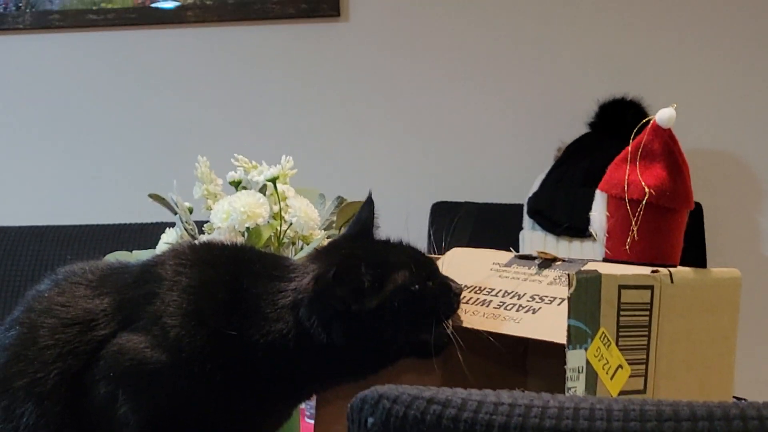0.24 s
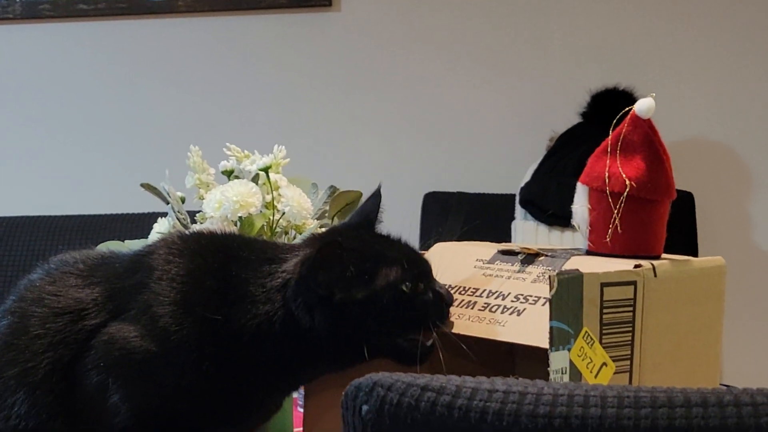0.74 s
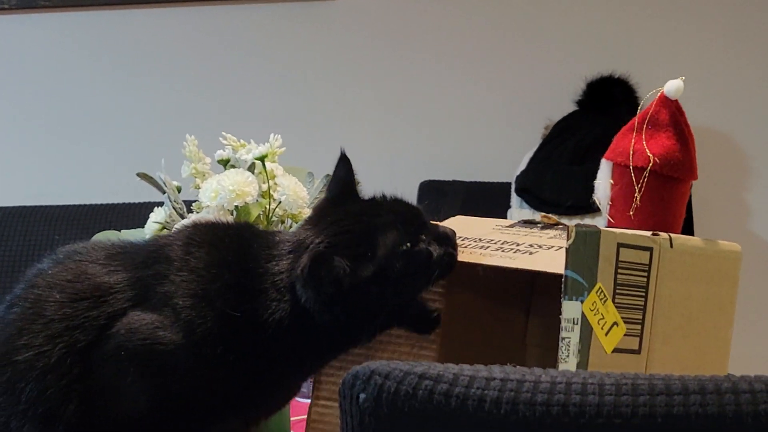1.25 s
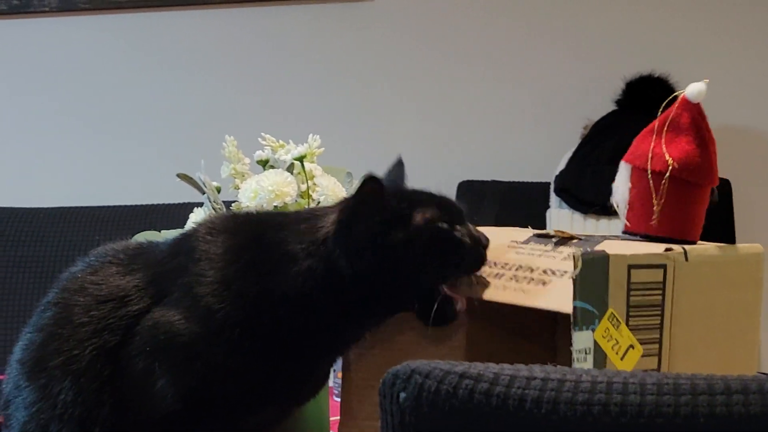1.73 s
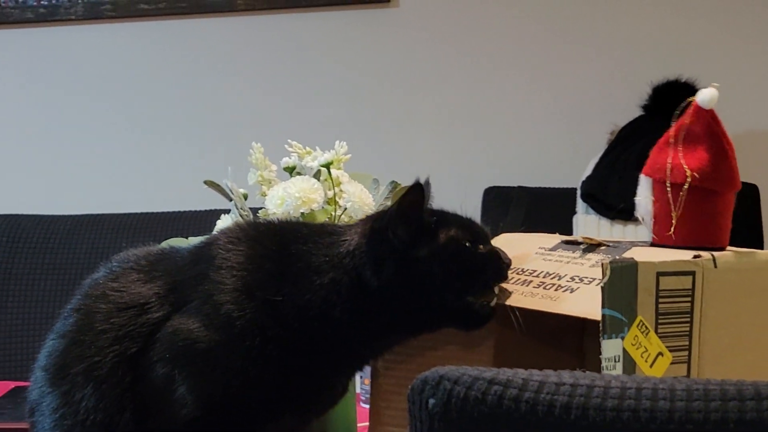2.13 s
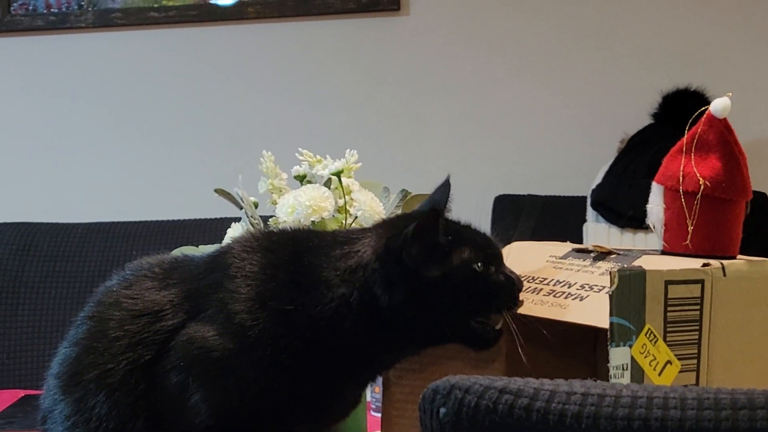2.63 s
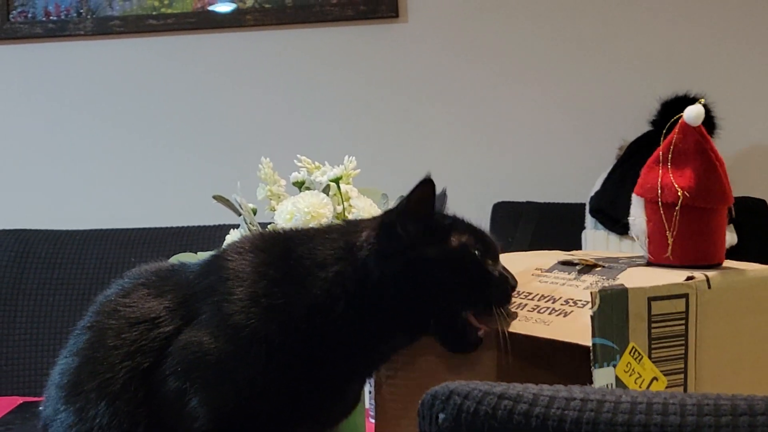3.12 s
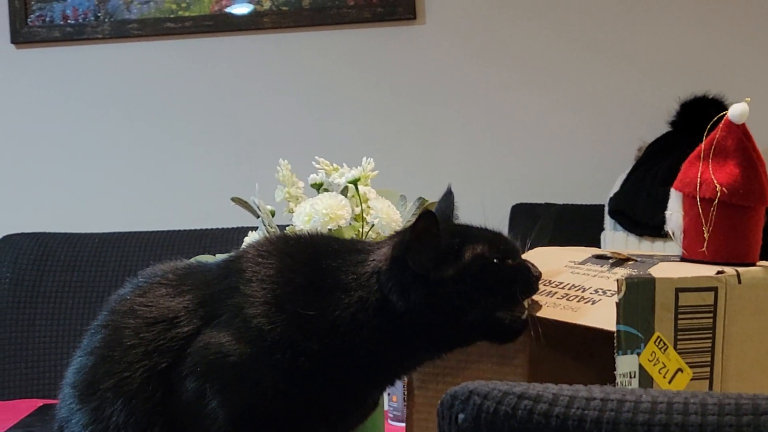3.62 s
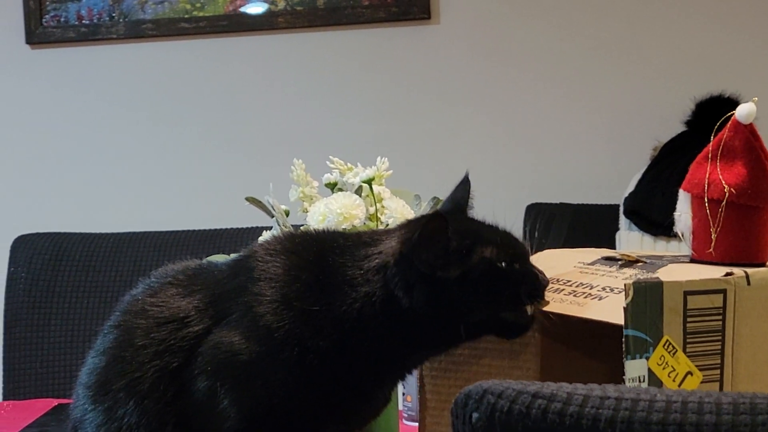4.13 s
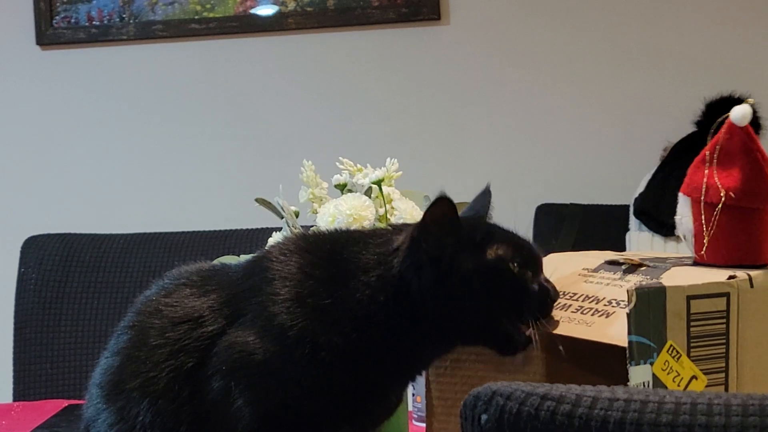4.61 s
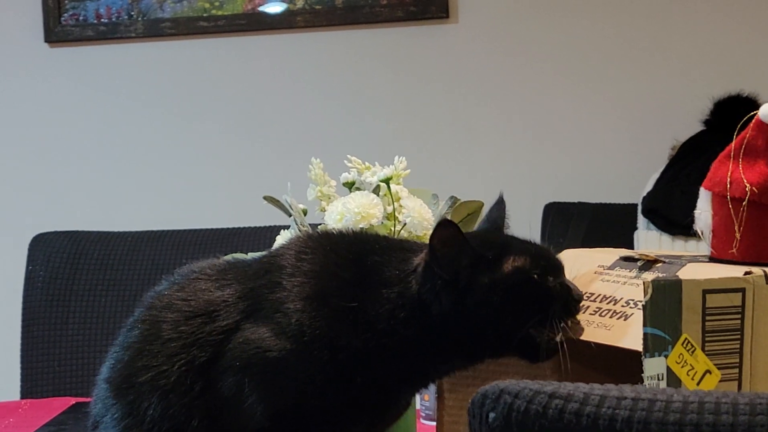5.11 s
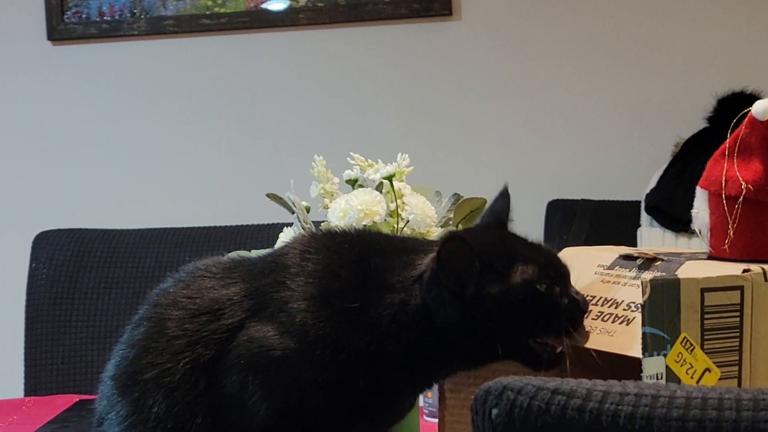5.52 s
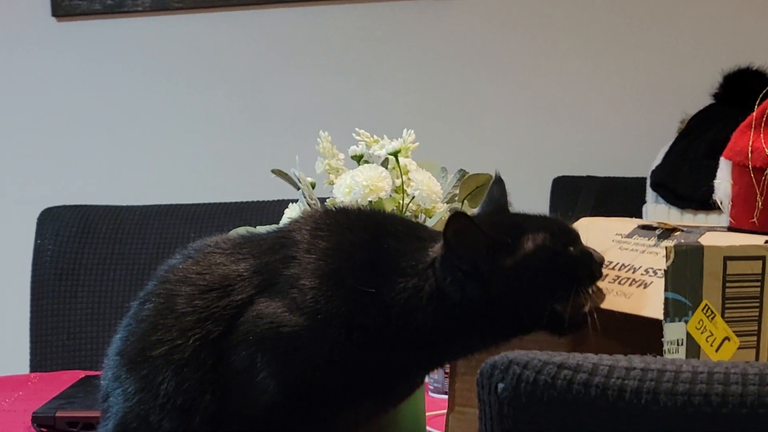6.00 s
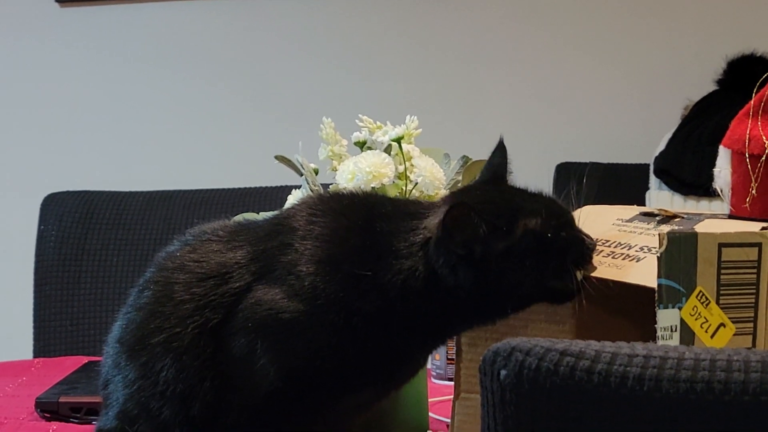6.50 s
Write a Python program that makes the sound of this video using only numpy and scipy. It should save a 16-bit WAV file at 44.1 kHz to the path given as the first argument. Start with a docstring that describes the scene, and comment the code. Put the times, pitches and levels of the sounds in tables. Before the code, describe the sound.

A cat gnaws a cardboard box flap in uneven bouts, with dry rasping, crackly crunches, hollow thumps and sharp jaw snaps in a quiet room.

```python
"""A cat gnaws the flap of a cardboard box in a quiet living room: teeth rasp in bouts, as random fibre ruptures.
Each slip of a tooth crackles, cracks the board and lets the flap spring back with a hollow thump (damped modes).
Jaw snaps, mostly between bouts, are a knock, a clack and a ring of the mouth; a few wet ticks are struck cavities.
A short echo, blended from several random patterns, and a low, slightly wavering hum (filtered noise) surround it."""
import sys
import numpy as np
from scipy import signal
from scipy.fft import rfft, irfft
from scipy.io import wavfile
from scipy.ndimage import uniform_filter1d

SR = 44100
rng = np.random.default_rng(int(sys.argv[2]) if len(sys.argv) > 2 else 0)


def store_wav(level_fs):
    """Save 16-bit WAV to argv[1]."""
    pcm = np.round(np.clip(np.atleast_2d(level_fs), -1, 1) * 32767)
    wavfile.write(sys.argv[1], SR, pcm.T.astype(np.int16))


N = 297675
TIME = np.arange(N) / SR
HIT = np.arange(SR // 4) / SR  # time axis of one short event, s
LEAD_S = 0.02  # onset of an event on the HIT axis

# Stiff bending modes of the board. Each row: frequency in Hz, relative level in dB, t60 in s.
BOARD_MODES = [(1183.4, 7, 0.081), (1287, 2, 0.036), (1600, -9, 0.03), (1893, -14, 0.059),
               (2282, -12, 0.087), (4380, -27, 0.042)]
# Spectrum of cracking board. Each row: frequency in Hz, relative level in dB.
CRACK_SPECTRUM = [(300, -7.5), (540, 9), (700, 2), (820, -12), (1000, 0), (1300, 5.5), (1650, 5),
                  (2300, -5), (2900, -11.5), (3800, -23), (4450, -15), (5200, -19.5), (7000, -23.5)]
# Spectrum of tearing fibres. Each row: frequency in Hz, relative level in dB.
FIBRE_SPECTRUM = [(1500, -33), (2800, -0.5), (4000, -3), (4450, -2.5), (5000, -3), (6400, -4), (7400, -1),
                  (9500, -2.5), (11500, -1), (13300, 4.5), (15000, 3), (16200, 1.5)]


def undb(db):
    """Decibels to gain."""
    return 10 ** (np.asarray(db) / 20)


def unit(x):
    """Scale to rms 1."""
    return x / np.sqrt(np.mean(x ** 2))


def burst(x, db, size=441):
    """Scale a short sound so that its loudest hundredth of a second has this rms level."""
    return x * undb(db) / np.sqrt(uniform_filter1d(x ** 2, size).max())


def along(points, hz):
    """Interpolate (Hz, value) points on a log-frequency axis."""
    f, value = np.transpose(points)
    return np.interp(np.log(np.maximum(hz, 1)), np.log(f), value)


def through(x, response):
    """Convolve with an impulse response, keeping the length."""
    return signal.fftconvolve(x, response)[:len(x)]


def colour(x, points, size=4096):
    """Minimum-phase filter with the given (Hz, dB) spectrum, via the folded cepstrum."""
    log_gain = np.log(undb(along(points, np.fft.rfftfreq(size, 1 / SR))))
    cepstrum = irfft(log_gain)
    cepstrum[1:size // 2] *= 2
    cepstrum[size // 2 + 1:] = 0
    return through(x, irfft(np.exp(rfft(cepstrum))))


def ring(x, modes):
    """Drive exponentially damped sine modes, given as (Hz, dB, t60 s)."""
    response = 0
    for hz, db, t60_s in modes:
        decay = np.exp(-np.log(1000) * HIT / t60_s)
        response = response + undb(db) * np.sin(2 * np.pi * hz * HIT) * decay
    return through(x, response)


def walk(rate_hz):
    """Slow random wander of rms 1: random steps, smoothed twice."""
    k = int(SR / rate_hz)
    steps = np.repeat(rng.standard_normal(N // k + 1), k)
    return unit(uniform_filter1d(uniform_filter1d(steps, k), k)[:N])


def grains(count, per_s, spread_db):
    """Single-sample ruptures at random moments, with random signs and a log-normal spread of size."""
    present = rng.random(count) < per_s / SR
    sign = rng.choice([-1, 1], count)
    return present * sign * undb(spread_db * np.clip(rng.standard_normal(count), -2, 2))


def swell(rise_s):
    """Envelope of a run of ruptures: crests about 1.4 rise_s after LEAD_S, dies away more slowly."""
    t = np.clip((HIT - LEAD_S) / max(rise_s, 1e-4) - 1, -60, 200)
    return 1 / (np.exp(-1.9 * t) + np.exp(0.62 * t))


def strike(delay_s):
    """One firm contact: a click a few samples wide, delay_s after LEAD_S."""
    return np.maximum(1 - abs(HIT - LEAD_S - delay_s) * SR / 2, 0)


def add(track, s, sound):
    """Mix a sound in at time s."""
    i = max(int(s * SR), 0)
    track[i:i + len(sound)] += sound[:N - i]


def diffuse(count, alike_hz):
    """Stereo noise from all sides: the ears share the bass and differ in the treble."""
    mid, side = rfft(rng.standard_normal((2, count)))
    alike = 1 / (1 + (np.fft.rfftfreq(count, 1 / SR) / alike_hz) ** 2) ** 2
    shared = mid * np.sqrt((1 + alike) / 2)
    opposed = np.array([[1], [-1]]) * side * np.sqrt((1 - alike) / 2)
    return irfft(shared + opposed, count)


def background(level_db=-49.5, waver_db=1.0, waver_hz=5.05):
    """Low hum of a quiet home: diffuse coloured noise, slightly wavering in level."""
    # Room at rest. Each row: frequency in Hz, relative level in dB per Hz.
    quiet_spectrum = [(25, -15.5), (55, -12), (84, 4), (122, -3.5), (170, 1.5), (285, -2), (380, -9),
                      (600, -5.5), (880, -17), (1200, -15.5), (2050, -20.5), (2700, -34.5), (4800, -45),
                      (16000, -51.5)]
    air = np.array([colour(side, quiet_spectrum) for side in diffuse(N, 720)])
    return unit(air) * undb(level_db + waver_db * walk(waver_hz))


def fur(level_db=-82, wander_db=3):
    """Coat and whiskers brush faintly: dense coloured grains, wandering in level."""
    brush = colour(grains(N, 1800, 2.1), [(1500, -1), (3500, -13.0), (8000, 6.0), (15000, -4.5)])
    return unit(brush) * undb(level_db + wander_db * walk(9))


def flap(force, swing_hz, swing_db=3, swing_t60_s=0.08):
    """Flap swings briefly at the grip's pitch and rings the box; too small to radiate deep bass."""
    # Hollow box behind the flap. Each row: frequency in Hz, relative level in dB, t60 in s.
    box_modes = [(214, -14, 0.24), (270.2, -15.5, 0.46), (320.7, -2, 0.097), (372, -14.5, 0.047),
                 (434, -5, 0.076), (516, -22.5, 0.047), (562, -21.5, 0.47)]
    swing = ring(force, box_modes + [(swing_hz, swing_db, swing_t60_s)])
    return colour(swing, [(35, -52.5), (85, -3.0), (160, -15.5), (250, -1.5)])


def spell(grip_s, release_s, db, slopes):
    """Gain that builds up to the grip, holds, and fades after the release, linearly in dB."""
    before_s = np.maximum(grip_s - TIME, 0)
    after_s = np.maximum(TIME - release_s, 0)
    return undb(db - slopes[0] * before_s - slopes[1] * after_s)


def gnawing(ruptures_per_s=600, rupture_spread_db=5.5, fits_per_s=60, fits_db=2.5, tugs_per_s=900):
    """Teeth drag over the paper in fits and starts: a fine rasp that also shakes board and flap."""
    # Steady gnawing. Each row: grip in s, release in s, relative rasp level in dB, flap shudder level in dB.
    bouts = [(0.004, 0.114, -71.5, -42.5), (0.257, 0.5, -62, -45), (1.2, 1.26, -66.5, -54),
             (1.878, 2.056, -74.5, -50.5), (2.116, 2.467, -60, -41), (3.445, 3.597, -84, -48.5),
             (3.595, 4.12, -56.5, -41), (4.483, 4.637, -75, -63.5), (5.992, 6.094, -82, -48),
             (6.205, 6.537, -55, -38.5)]
    # The cat leans on the flap before its teeth grip: build-up in dB per s, fade in dB per s.
    rasp_slopes = (230, 142)
    # The same for the flap's shudder: build-up in dB per s, fade in dB per s.
    shudder_slopes = (56, 260)
    rasp = sum(spell(grip_s, release_s, db, rasp_slopes) for grip_s, release_s, db, _ in bouts)
    shudder = sum(spell(grip_s, release_s, db, shudder_slopes) for grip_s, release_s, _, db in bouts)
    stick_slip = undb(fits_db * walk(fits_per_s))
    ruptures = grains(N, ruptures_per_s, rupture_spread_db) * stick_slip
    fibres = undb(6.5) * unit(colour(ruptures, FIBRE_SPECTRUM))
    cracking = undb(5.5) * unit(colour(ruptures, CRACK_SPECTRUM))
    ringing = undb(-3) * unit(ring(ruptures, BOARD_MODES))
    tugs = grains(N, tugs_per_s, 0.8)  # small and even
    return rasp * (fibres + cracking + ringing) + shudder * unit(flap(tugs, 335.0))


def cavity(hz, cycles=32, db=8):
    """Mouth resonance that moves with the opening; soft tissue damps it by 60 dB in 32 cycles."""
    return [(hz, db, cycles / hz)]


def snaps(again_s=0.015, again_db=-10, firm_knock_db=1, firm_mouth_db=11):
    """Teeth meet firmly amid lighter touches: knock, clack, mouth ring; higher is quicker and brighter."""
    # Jaw snaps. Each row: start in s, knock level in dB, clack level in dB, clack pitch as a ratio,
    # level in dB of each of two equal mouth rings, mouth cavity in Hz.
    snap_events = [(0.039, -43, -48.5, 0.75, -51.5, 1420), (1.708, -50, -63, 0.72, -57.5, 1140),
                   (2.868, -31, -26, 1.061, -30, 1140), (3.073, -33, -40, 0.79, -46, 990),
                   (3.259, -34, -44.5, 0.8, -54, 740), (3.282, -36, -51, 0.56, -61, 530),
                   (3.433, -32.5, -46, 0.69, -54.5, 1160), (4.209, -42.5, -49, 0.74, -50.5, 1440),
                   (4.478, -38, -52, 0.97, -61, 690), (4.688, -36, -44, 0.66, -59.5, 508),
                   (5.134, -34, -52, 1.174, -50, 2200), (5.263, -35.5, -44, 1.083, -41.5, 1620),
                   (5.772, -37, -54, 0.58, -62, 490), (5.855, -38.5, -54, 0.93, -52, 840),
                   (6.658, -40, -55, 0.61, -60, 1150)]
    # Dull knock. Each row: frequency in Hz, relative level in dB.
    knock_spectrum = [(30, -46), (60, -23), (100, 0), (150, -5), (240, -2), (450, 2), (620, -10),
                      (850, -33), (1500, -73)]
    # Clack at pitch 1. Each row: frequency in Hz, relative level in dB.
    clack_spectrum = [(450, -36.5), (750, 11), (1000, 8), (1400, -2), (1700, 9), (2300, -2.5),
                      (3200, -17.5), (4500, -34), (8000, -37)]
    # Bright edge of the contact. Each row: frequency in Hz, relative level in dB.
    edge_spectrum = [(1800, -15), (3200, 8.5), (4300, 0), (7400, -1), (10500, -2.5), (14000, -4),
                     (16000, -5)]
    # Teeth and mouth. Each row: frequency in Hz, relative level in dB, t60 in s.
    mouth_modes = [(692, 7, 0.047), (862, 1.5, 0.035), (1164, 7, 0.053), (1621, 5.5, 0.034),
                   (1857, -0.5, 0.042), (3080, -9, 0.023), (4260, -13.5, 0.017)]
    out = np.zeros(N)
    for s, knock_db, clack_db, pitch, mouth_db, cavity_hz in snap_events:
        rise_s = 0.0036 / pitch ** 1.4  # lower, fleshier contacts take longer
        edge_db = clack_db - 10.5 + 45 * np.log2(pitch)  # 45 dB per octave of pitch
        contact, firm = swell(rise_s), strike(rise_s)
        # the jaw settles with a second, softer touch
        second = undb(again_db) * np.interp(HIT - again_s, HIT, swell(2 * rise_s))
        settle = swell(rise_s / 2) + second
        knock = colour(settle * grains(len(HIT), 2700, 1) + undb(firm_knock_db) * firm, knock_spectrum)
        touches = contact * grains(len(HIT), 3000, 7.1)
        mouth = ring(touches + undb(firm_mouth_db) * firm, mouth_modes + cavity(cavity_hz))
        clack = colour(touches, [(hz * pitch, db) for hz, db in clack_spectrum])
        edge = colour(contact * grains(len(HIT), 6300, 6.2), edge_spectrum)
        snap = burst(knock, knock_db) + burst(clack, clack_db) + burst(edge, edge_db)
        add(out, s - LEAD_S, snap + 2 * burst(mouth, mouth_db))
    return out


def bites(tear_rise_s=0.0033, push_rise_s=0.00063, board_db=-15.5, board_db_per_crack_db=0.67):
    """A tooth tears a run of fibres, the board cracks and rings, and the released flap swings."""
    # Teeth slipping on the flap. Each row: start in s, flap thump level in dB, fibre tear level in dB,
    # crack level in dB, swing of the flap in Hz.
    bite_events = [(0.093, -29, -40.5, -32, 333), (0.104, -21, -38.5, -32, 336),
                   (0.123, -24.5, -42, -38, 320), (0.234, -36.5, -45, -48.5, 344),
                   (0.29, -48, -47, -47, 332), (0.314, -34, -40.5, -41.5, 328),
                   (0.358, -32.5, -26.5, -36.5, 411), (0.421, -37, -44, -43.5, 316),
                   (0.487, -15.5, -30, -33, 337), (0.496, -32, -54, -51, 330),
                   (0.558, -31.5, -69, -50, 292), (1.471, -32, -64.5, -57.5, 326),
                   (1.918, -35, -64, -58, 336), (1.973, -30, -76, -54.5, 357),
                   (2.077, -25.5, -47, -43.5, 324), (2.159, -24.5, -47, -45.5, 320),
                   (2.208, -40, -54, -49, 332), (2.322, -35, -41, -43.5, 340), (2.344, -9.5, -30, -26, 331),
                   (2.416, -29, -47, -42, 288), (2.468, -17, -34, -33.5, 269),
                   (2.515, -18.5, -41, -39, 307), (3.073, -29, -73, -51, 322),
                   (3.259, -36.5, -61, -71, 327), (3.593, -28.5, -38, -31, 310),
                   (3.62, -26.5, -44, -41.5, 324), (3.684, -33, -43, -41.5, 342),
                   (3.705, -32, -45, -46, 363), (3.764, -32, -37.5, -36.5, 330),
                   (3.831, -14.5, -29, -27.5, 333), (3.874, -26.5, -46, -46, 320),
                   (3.952, -29, -39, -42.5, 342), (4.015, -29.5, -37, -36.5, 402),
                   (4.103, -34.5, -42.5, -44.5, 270), (5.073, -27, -75, -51, 289),
                   (5.085, -29, -66, -49.5, 471), (5.973, -25, -78, -56, 332.5),
                   (6.159, -31.5, -51, -43.5, 490), (6.206, -27.5, -42.5, -48, 280),
                   (6.266, -32, -59, -61, 293), (6.282, -26.5, -63, -61, 345),
                   (6.329, -21.5, -33, -29.5, 356), (6.338, -20.5, -49, -36.5, 286),
                   (6.467, -32, -45.5, -44, 343), (6.501, -43, -35, -32, 323),
                   (6.541, -33, -38.5, -40, 339), (6.586, -38.5, -46.5, -48, 435)]
    out = np.zeros(N)
    for s, thump_db, tear_db, crack_db, swing_hz in bite_events:
        tear = swell(tear_rise_s)
        ring_db = board_db + board_db_per_crack_db * crack_db
        release = -np.gradient(swell(push_rise_s))
        push = release + undb(-30) * tear * grains(len(HIT), 1100, 5.9)
        cracks = tear * grains(len(HIT), 2400, 4.6)
        # every grip stiffens the board a little differently
        stiffness = 1 + 0.017 * rng.standard_normal()
        board = ring(cracks, [(hz * stiffness, db, t60_s) for hz, db, t60_s in BOARD_MODES])
        fibres = colour(tear * grains(len(HIT), 2000, 4), FIBRE_SPECTRUM)
        crack = burst(colour(cracks, CRACK_SPECTRUM), crack_db)
        crunch = crack + burst(board, ring_db) + burst(fibres, tear_db)
        add(out, s - LEAD_S, burst(flap(push, swing_hz), thump_db) + crunch)
    return out


def smacks():
    """Films of saliva pop and ring a tiny cavity, which dies by 60 dB in 17 cycles."""
    # Small wet ticks. Each row: start in s, level in dB, pitch in Hz.
    tick_events = [(1.673, -75, 4240), (1.862, -69, 9050), (1.975, -59, 3080)]
    out = np.zeros(N)
    for s, db, hz in tick_events:
        pop = ring(strike(0.001), [(hz, 0, 17 / hz)])
        tick = colour(pop, [(hz / 2, -16), (hz, 0), (2 * hz, -16)])
        add(out, s - LEAD_S, burst(tick, db))
    return out


def room(dry, lag_s=0.000052, bounce_s=0.0079, bounce_db=-11, near_db=0.5, near_s=0.0039, far_db=-6):
    """Direct sound a little from the right, a wall bounce, scatter from box and table, then the tail."""
    # Decay of the room. Each row: frequency in Hz, t60 in s.
    decay_bands = [(150, 0.24), (400, 0.28), (1200, 0.19), (3500, 0.3), (8000, 0.18), (15000, 0.19)]
    # Right side against left, by pitch. Each row: frequency in Hz, level difference in dB.
    lean = [(550, 0.3), (1100, -0.3), (2200, -2.9), (4200, 2), (14000, 0.6)]
    t = np.arange(SR // 2) / SR
    hz = np.fft.rfftfreq(len(t), 1 / SR)
    late_s = np.array([[lag_s], [0]])  # left, right
    # the cat's head shades the direct treble
    direct = np.exp(-2j * np.pi * hz * late_s) * undb(along([(900, -1.34), (6000, -10.0)], hz))
    bounce = undb(bounce_db) * np.exp(-2j * np.pi * hz * (bounce_s - late_s))
    scatter = undb(near_db) * rfft(diffuse(len(t), 1900) * np.exp(-t / near_s))
    scatter = scatter * np.sqrt(2 / (near_s * SR))
    # mainly short waves bounce and scatter off the things nearby
    early = (bounce + scatter) * hz ** 2 / (hz ** 2 + 1000 ** 2)
    noise = rfft(diffuse(len(t), 1100))
    centres_hz = np.array(decay_bands)[:, 0]
    onset = 1 - np.exp(-(t / 0.0044) ** 2)
    tail = 0
    for share, (_, t60_s) in zip(np.eye(len(decay_bands)), decay_bands):
        band = irfft(noise * along(np.c_[centres_hz, share], hz), len(t))
        tail = tail + band * np.exp(-np.log(1000) * t / t60_s) * onset
    tail_db = along([(330, -2.0), (600, 3.0), (3000, 5.0), (8000, 4.0), (14000, -1.0)], hz)
    tail = rfft(unit(tail)) / np.sqrt(len(t)) * undb(far_db + tail_db)
    shade = undb(np.array([[-1], [1]]) / 2 * along(lean, hz))
    response = irfft((direct + early + tail) * shade, len(t))
    response = np.roll(response, 16, axis=1)  # keeps the filter's pre-ringing ahead of the direct sound
    return np.array([through(dry, r[:-len(t) // 10]) for r in response])


def shifting(dry, count=14):
    """The cat keeps moving its head, so the reflections blend from one random pattern into the next."""
    place = TIME / TIME[-1] * (count - 1)
    out = np.zeros((2, N))
    for k in range(count):
        near = np.flatnonzero(abs(place - k) < 1)
        fade = np.cos(np.pi / 2 * (place[near] - k)) ** 2
        heard = room(np.pad(dry[near] * fade, (0, SR // 2)))
        for side in range(2):
            add(out[side], TIME[near[0]], heard[side])
    return out


def scene(cat_db=-2.5, right_db=0.48):
    """Cat and box in the room, ticks mostly dry, and the hum; the right side is right_db louder."""
    ticks = smacks()
    cat = bites() + gnawing() + snaps() + fur() + undb(-7) * ticks
    mix = undb(cat_db) * shifting(cat) + ticks + background()
    return mix * undb(np.array([[-1], [1]]) / 2 * right_db)


def record(dry, top_hz=15900):
    """Steep elliptic low-pass that cuts the top."""
    return signal.sosfilt(signal.ellip(10, 0.2, 80, top_hz, fs=SR, output="sos"), dry)


dry = scene()
out = record(dry)
store_wav(out)
```